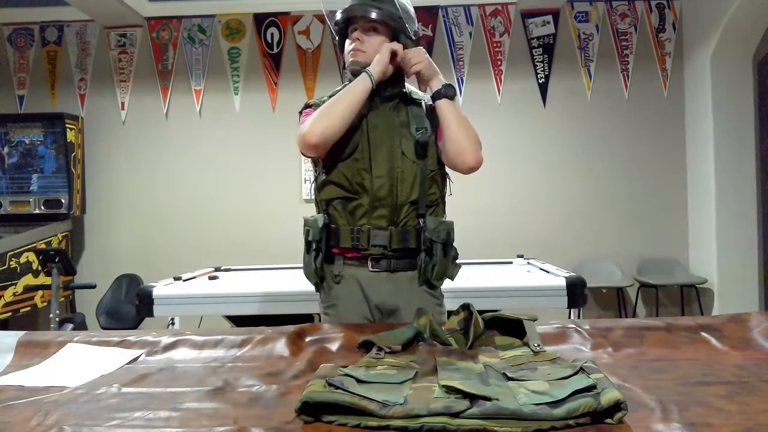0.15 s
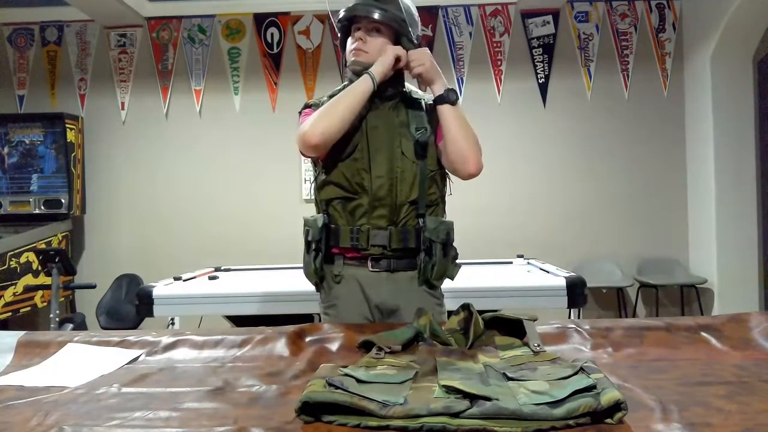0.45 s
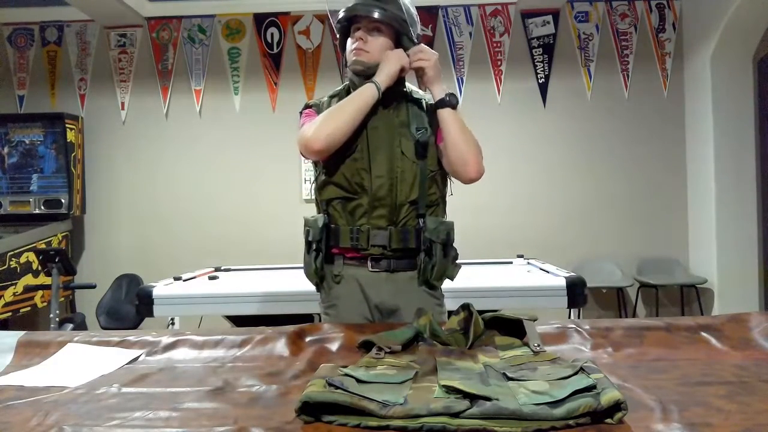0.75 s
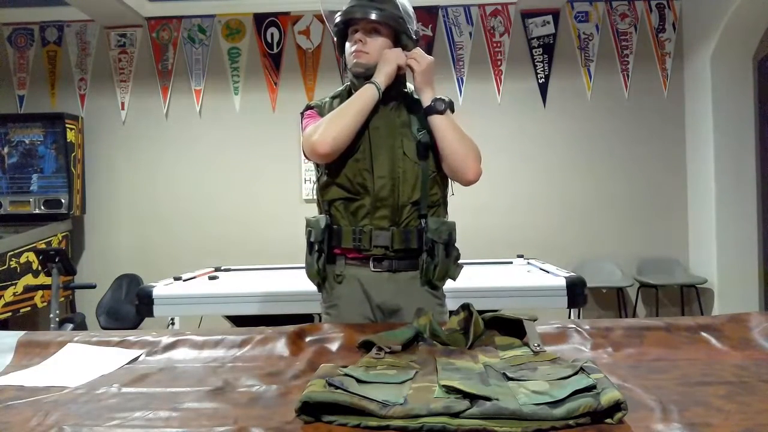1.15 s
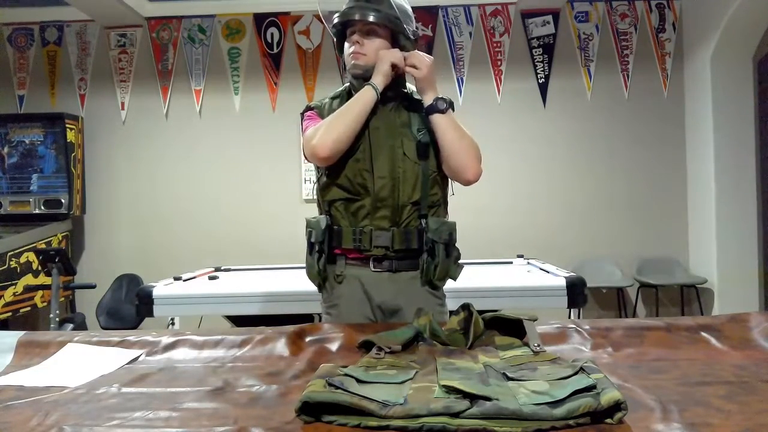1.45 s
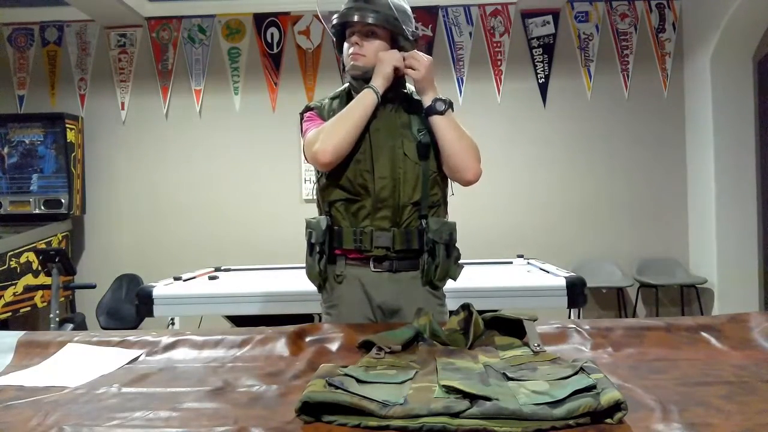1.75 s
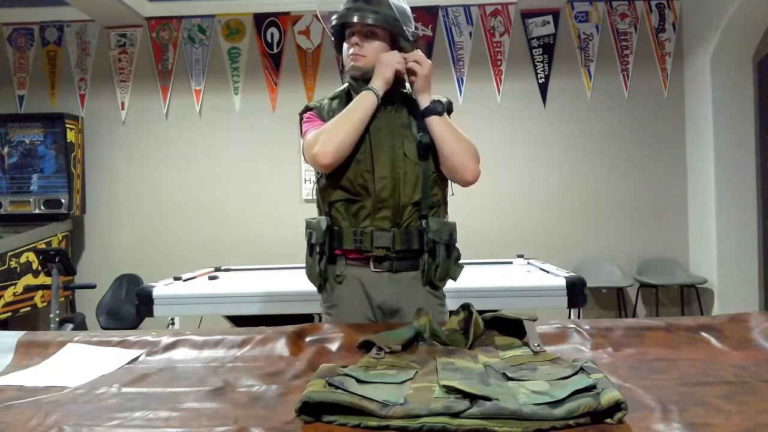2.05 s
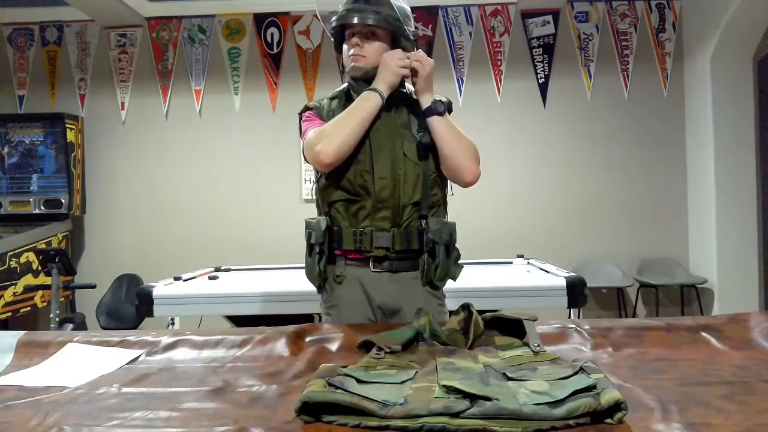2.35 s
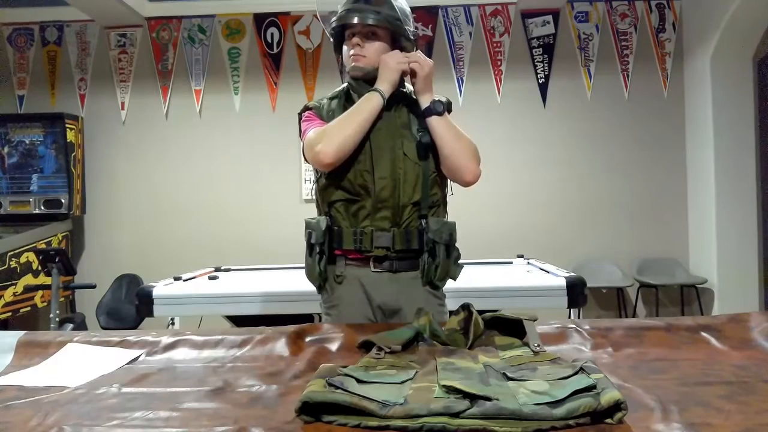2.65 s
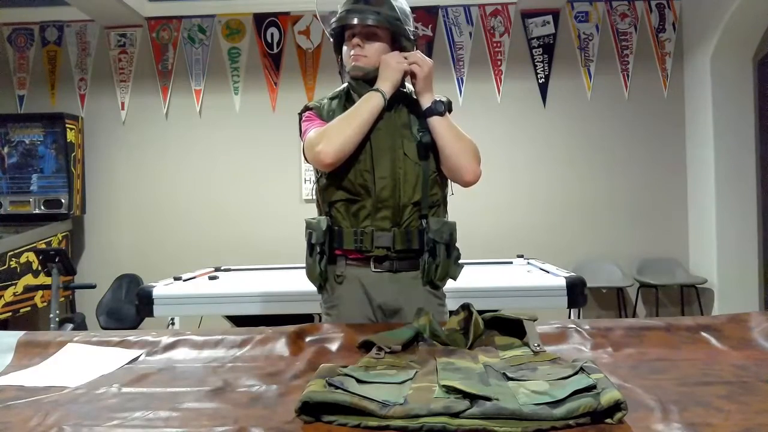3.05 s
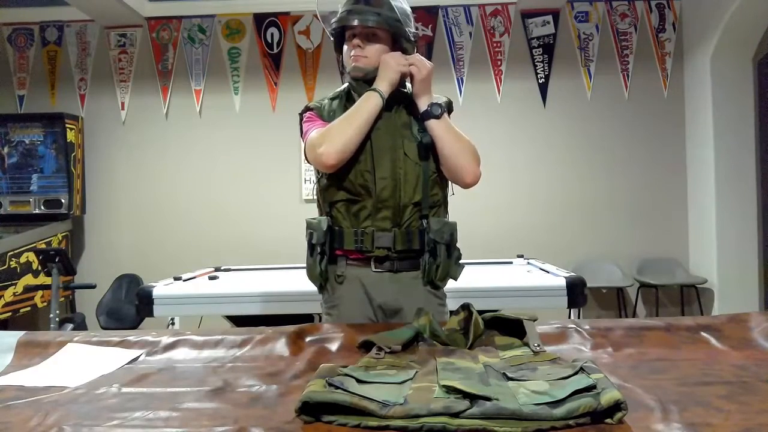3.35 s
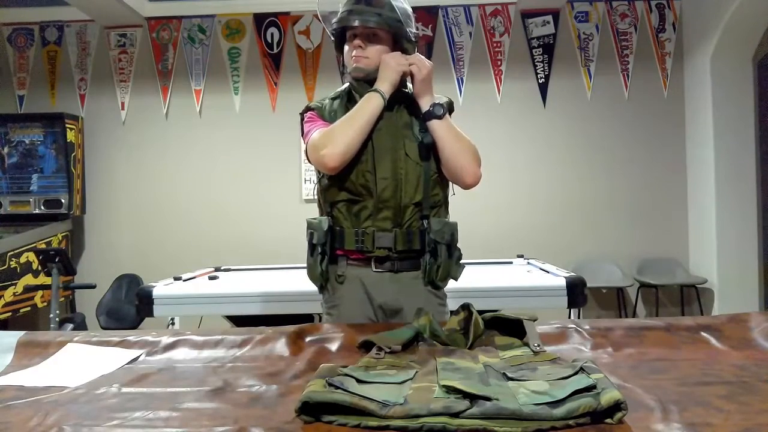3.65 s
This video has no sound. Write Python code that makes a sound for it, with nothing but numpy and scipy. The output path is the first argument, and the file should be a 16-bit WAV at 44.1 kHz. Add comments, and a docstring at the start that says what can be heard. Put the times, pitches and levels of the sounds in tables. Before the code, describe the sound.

Helmet strap buckle being fastened: tiny clicks and barely audible webbing rub, a crisp snap near the end that rings through the bare room, then a smaller click, over quiet steady ventilation, microphone across the room.

```python
"""A helmet's chin-strap stud snaps home in a bare, echoing games room, then settles with one more click.
Before that the fastener's halves tick lightly; snaps and ticks are struck decaying modes with friction noise.
The webbing's faint rub is coloured noise in soft swells; each click gets echoes and a noise reverberation.
A ventilation fan hums throughout: coloured noise, narrow noise resonances and one low sine."""
import sys
import numpy as np
from scipy import signal
from scipy.fft import rfft, irfft
from scipy.io import wavfile

SR = 44100
rng = np.random.default_rng(int(sys.argv[2]) if len(sys.argv) > 2 else 0)


def wav_out(sig):
    """Save sig, one row per channel (or a flat mono array), as 16-bit PCM at SR to the path in sys.argv[1]."""
    wavfile.write(sys.argv[1], SR, np.round(np.clip(np.atleast_2d(sig).T, -1, 1) * 32767).astype(np.int16))


N = 167580   # 3.8 s

# Stud snaps home, then seats under the thumb:
# start_s, level_db, ring_share (of the free ring), room_db, room_tilt_db_per_octave, scratch_db
SNAPS = [(3.1918, -11.5, 1.0, -5, 1, -40), (3.5610, -28.5, 0.5, -39, 9, -41.5)]
# Contacts within a snap, as the stud passes the lip, lands and rebounds: delay_s, level_db
SNAP_CONTACTS = [(-.0005, -8.5), (0, -1.5), (.001, -8.5)]
# Ring of the fastener: pitch_hz, level_db, t60_s
FASTENER_MODES = [(1100, -53, 0.0089), (1640, -17.5, 0.004), (2220, -47, 0.025), (2906, -12.5, 0.008),
                  (4030, 0, 0.0078), (5130, -6.5, 0.0052), (5800, -3, 0.0083), (7500, -2, 0.01),
                  (8230, -14, 0.0044)]
# What the stud radiates into the room: freq_hz, relative_level_db
SNAP_ROOM_COLOUR = [(100, -33), (300, -16), (900, -21), (1400, -14), (2200, -12.5), (3000, -10.5),
                    (3500, -3.5), (4050, 3), (4600, -3.5), (5600, 4), (6600, -1.5), (7600, 2), (8700, -8.5),
                    (10000, -13.5), (12000, -26.5), (15000, -36)]
# Light touches of the halves:
# catch_s, peak_db, tone_centre_hz, tone_half_width_octaves, slide_s (before the catch), room_db, scratch_db
TOUCHES = [(0.002, -55.5, 6450, 0.69, .002, -43.5, -75), (0.349, -60, 5000, .5, .001, -62, -78),
           (1.145, -54, 5400, .35, 0.0024, -53, -72), (1.8999, -40, 4070, 0.58, .004, -42, -54),
           (2.0902, -46, 7140, .25, 0.00093, -47, -76), (2.46, -29.5, 6300, 1, 0.0013, -31, -52)]
# Ring of the loose halves: pitch_hz, level_db, t60_s
LOOSE_MODES = [(2230, -28, .005), (3150, -3.5, 0.0075), (4020, -3, 0.006), (5120, -2, 0.009),
               (5900, -8, 0.011), (6760, -6, 0.0079), (7980, -12, 0.0074)]
# What the loose halves radiate into the room: freq_hz, relative_level_db
TICK_ROOM_COLOUR = [(1000, 3), (3000, 4), (4300, 6), (5100, 9), (6000, 5), (6900, 10), (8000, 0),
                    (10000, -1), (15000, -40)]
# Webbing slides: middle_s, length_s, level_db
WEBBING_RUBS = [(.03, 0.24, -77), (.43, 0.24, -74), (.74, 0.12, -72.5), (.95, .15, -78),
                (1.163, 0.082, -77)]
# Webbing friction spectrum: freq_hz, relative_db_per_hz
WEBBING_SPECTRUM = [(1500, -28), (3000, 1.5), (4800, -2), (7000, -11), (10000, -30), (16000, -20)]
# Fan resonances: pitch_hz, width_hz, rms_db
FAN_RESONANCES = [(27.6, 3.4, -76), (121, 7.8, -81), (236, 8.3, -74.5), (582, 13.3, -71.5), (614, 3.8, -73),
                  (838.7, 14, -69.5), (886.4, 22, -65), (1202, 14, -75.5), (1228.2, 8.9, -71.5)]
# Fan airflow spectrum: freq_hz, relative_db_per_hz
AIR_SPECTRUM = [(20, 4.5), (50, -3.5), (100, -3.5), (180, -9), (300, -4), (500, -7.5), (750, -6),
                (1000, -8.5), (1400, -12), (2500, -17), (5000, -21.5), (9000, -25.5), (15500, -26.5)]
# Gain of the hum band, with a brief swell near the end: time_s, gain_db
HUM_GAIN = [(0, -0.5), (2.3, 0), (3.15, 0), (3.42, 6.5), (3.62, 3.5), (3.8, 1)]
# Early echoes: delay_s, level_db
EARLY_ECHOES = [(.0043, -14), (.0086, -17), (0.0101, -25.5)]
# Reverberation decay: freq_hz, t60_s
ROOM_DECAY = [(300, 0.66), (2000, 0.69), (4000, 0.79), (7000, 0.57), (10000, 0.53), (15000, 0.8)]

SLIDE_DB, SLIDE_CONTACTS = -4, 3   # level relative to the catch
SCRATCH_DECAY_S, SCRATCH_LOW_HZ, SCRATCH_TOP_HZ, SCRATCH_ROOM_DB = .002, 2000, 9000, 7.5
AIR_RMS_DB, MOTOR_HZ, MOTOR_RMS_DB = -61.5, 29.05, -73.5
HUM_LOW_HZ, HUM_TOP_HZ = 50, 1400
# Diffuse sound builds up from these levels over BUILD_S
BUILD_S, SNAP_EARLY_DB, TICK_EARLY_DB = 0.051, -11, -1
CUTOFF_HZ = 15650


def snap():
    """The stud springs into its socket in a few contacts and sets the room ringing."""
    direct, tails = np.zeros((2, N))
    for start_s, level_db, ring_share, room_db, tilt_db, scratch_db in SNAPS:
        for delay_s, contact_db in SNAP_CONTACTS:
            contact = from_db(level_db + contact_db) * strike(FASTENER_MODES, ring_share)
            add(direct, start_s + delay_s, contact)
        tail = reverberation(SNAP_ROOM_COLOUR, SNAP_EARLY_DB, tilt_db)
        add(tails, start_s, from_db(room_db) * tail)
        add(tails, start_s, from_db(scratch_db) * scratch())
    return with_echoes(direct) + tails


def strike(modes, ring_share=1):
    """One contact rings decaying modes of alternating sign; a finger on the part shortens the ring."""
    t = np.arange(SR // 20) / SR
    out = np.zeros(len(t))
    for k, (hz, level_db, t60_s) in enumerate(modes):
        envelope = from_db(level_db - 60 * t / (t60_s * ring_share))
        out += (-1) ** k * envelope * np.sin(2 * np.pi * hz * t)
    return out


def ticks():
    """Each touch skids over a few tiny contacts and catches; where it lands sets its tone."""
    out, friction = np.zeros(N), scratch()
    for catch_s, peak_db, centre_hz, octaves, slide_s, room_db, scratch_db in TOUCHES:
        add(out, catch_s - slide_s / 2, from_db(scratch_db) * friction)
        touch = np.zeros(N)
        add(touch, catch_s, strike(LOOSE_MODES))
        for k in range(SLIDE_CONTACTS):
            lead_s = slide_s * (k + rng.uniform(.5, 1)) / SLIDE_CONTACTS
            add(touch, catch_s - lead_s, from_db(SLIDE_DB) * strike(LOOSE_MODES))
        edges_hz = [centre_hz / 2 ** octaves, centre_hz * 2 ** octaves]
        tone = signal.butter(2, edges_hz, "band", fs=SR, output="sos")
        touch = signal.sosfilt(tone, touch + 1e-18)
        out += with_echoes(from_db(peak_db) * touch / np.abs(touch).max())
        tail = signal.sosfilt(tone, reverberation(TICK_ROOM_COLOUR, TICK_EARLY_DB))
        add(out, catch_s, from_db(room_db) * tail)
    return out


def scratch():
    """A sliding contact makes a tiny burst of bright friction, with its reverberation."""
    t = np.arange(SR) / SR
    burst = rng.standard_normal(SR) * np.exp(-t / SCRATCH_DECAY_S)
    burst = signal.sosfilt(signal.butter(2, SCRATCH_TOP_HZ, fs=SR, output="sos"), burst)
    tail = from_db(SCRATCH_ROOM_DB) * reverberation(TICK_ROOM_COLOUR, TICK_EARLY_DB)
    high_pass = signal.butter(2, SCRATCH_LOW_HZ, "high", fs=SR, output="sos")
    return signal.sosfilt(high_pass, burst + tail)


def webbing():
    """Friction noise in soft swells as the strap is drawn along."""
    t = np.arange(N) / SR
    swell = np.zeros(N)
    for middle_s, length_s, level_db in WEBBING_RUBS:
        swell += from_db(level_db) * np.exp(-2 * ((t - middle_s) / length_s) ** 2)
    return swell * rms_one(coloured(rng.standard_normal(N), WEBBING_SPECTRUM))


def fan():
    """Airflow hisses and stirs narrow, wavering resonances over the motor's steady low tone."""
    t = np.arange(N) / SR
    freq_hz = np.fft.rfftfreq(N, 1 / SR)
    air = from_db(AIR_RMS_DB) * rms_one(coloured(rng.standard_normal(N), AIR_SPECTRUM))
    for hz, width_hz, rms_db in FAN_RESONANCES:
        response = 1 / (1 + ((freq_hz - hz) / width_hz) ** 2)
        resonance = irfft(rfft(rng.standard_normal(N)) * response, N)
        air += from_db(rms_db) * rms_one(resonance)
    hum_band = signal.butter(2, [HUM_LOW_HZ, HUM_TOP_HZ], "band", fs=SR, output="sos")
    hum = signal.sosfiltfilt(hum_band, air)
    hum_gain = from_db(np.interp(t, *np.transpose(HUM_GAIN)))
    motor = from_db(MOTOR_RMS_DB) * np.sqrt(2) * np.sin(2 * np.pi * MOTOR_HZ * t)
    return air + motor + hum * (hum_gain - 1)   # hum is already in air once


def with_echoes(x):
    """Nearby surfaces return a few distinct echoes."""
    out = x.copy()
    for delay_s, level_db in EARLY_ECHOES:
        add(out, delay_s, from_db(level_db) * x)
    return out


def reverberation(colour, early_db, tilt_db=0):
    """The room's diffuse answer to a click: noise builds up, each band dying at its own rate."""
    t = np.arange(SR) / SR
    freq_hz = np.fft.rfftfreq(SR, 1 / SR)
    pivot_hz = FASTENER_MODES[4][0]
    tilted = [(hz, db + tilt_db * np.log2(hz / pivot_hz)) for hz, db in colour]
    noise = rfft(rms_one(coloured(rng.standard_normal(SR), tilted)))
    centres_hz = np.geomspace(200, 16000, 14)
    tail = np.zeros(SR)
    for hz, pick in zip(centres_hz, np.eye(len(centres_hz))):
        band = irfft(noise * np.interp(freq_hz, centres_hz, pick), SR)
        tail += band * from_db(-60 * t / at_hz(ROOM_DECAY, hz))
    build_up = from_db(early_db * np.maximum(1 - t / BUILD_S, 0))
    fade_in = np.clip(t / EARLY_ECHOES[1][0], 0, 1)   # full by the second echo
    return tail * build_up * fade_in / 10


def from_db(db):
    """Decibels to gain."""
    return 10 ** (np.asarray(db) / 20)


def rms_one(x):
    """Scale to rms 1."""
    return x / np.sqrt(np.mean(x ** 2) + 1e-20)


def at_hz(points, hz):
    """Read a table on a log-frequency axis."""
    table_hz, values = np.transpose(points)
    return np.interp(np.log(np.maximum(hz, 1)), np.log(table_hz), values)


def coloured(x, spectrum):
    """Give noise a spectrum."""
    gain = from_db(at_hz(spectrum, np.fft.rfftfreq(len(x), 1 / SR)))
    return irfft(rfft(x) * gain, len(x))


def add(out, start_s, x):
    """Mix a sound in at a time."""
    i = max(int(start_s * SR), 0)
    out[i:i + len(x)] += x[:max(len(out) - i, 0)]


def scene():
    """The fastener and strap in the room, over the fan."""
    return (snap() + ticks() + webbing() + fan())[None]


def record(dry):
    """A steep elliptic low-pass cuts the top."""
    low_pass = signal.ellip(10, .1, 70, CUTOFF_HZ, fs=SR, output="sos")
    return signal.sosfilt(low_pass, dry)


dry = scene()
out = record(dry)
wav_out(out)
```